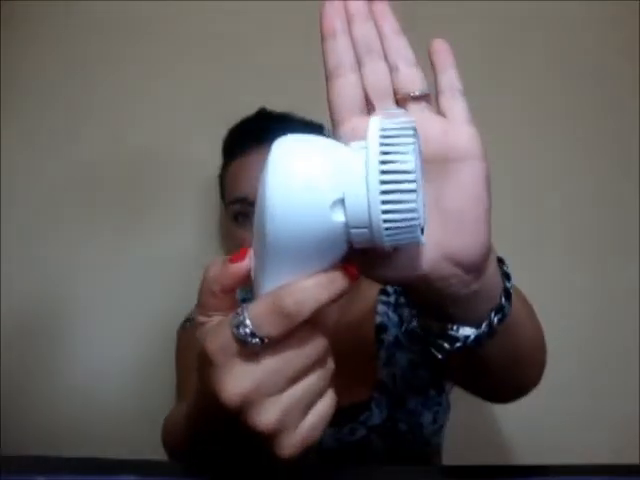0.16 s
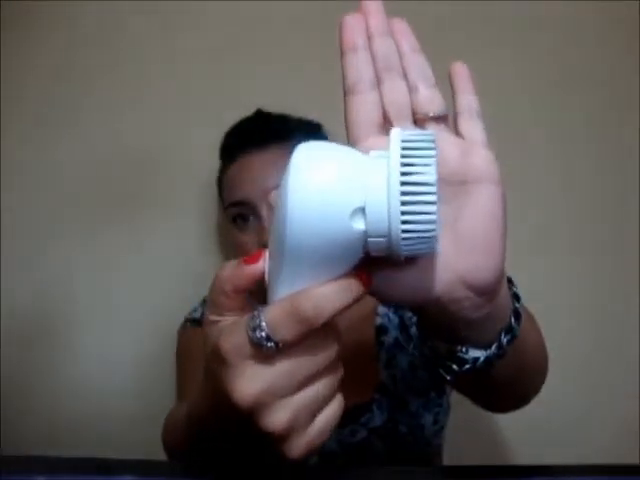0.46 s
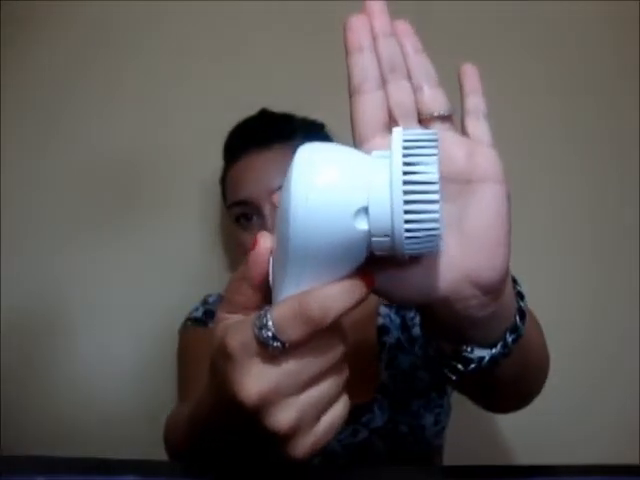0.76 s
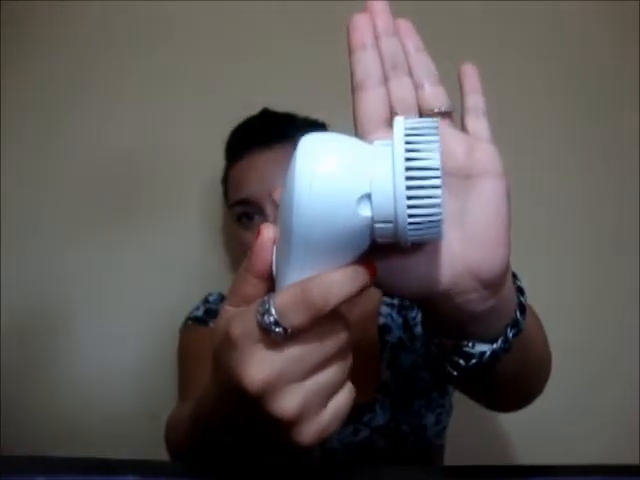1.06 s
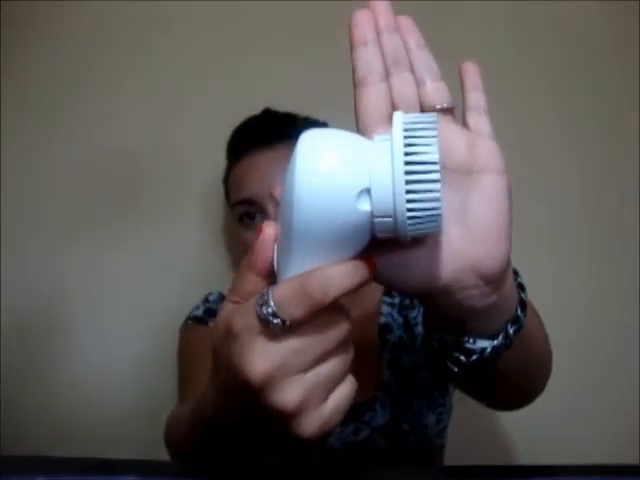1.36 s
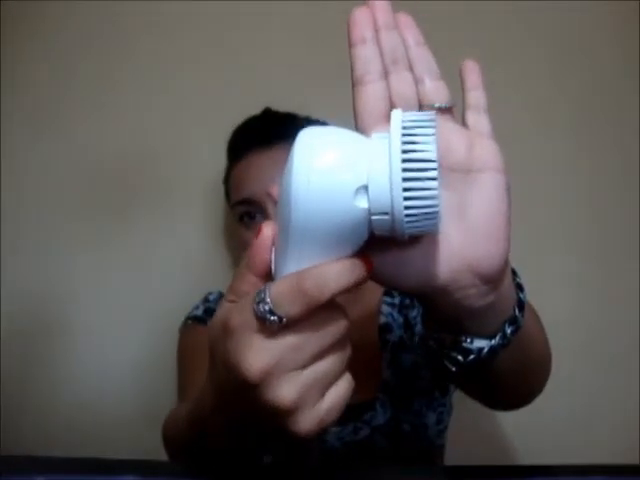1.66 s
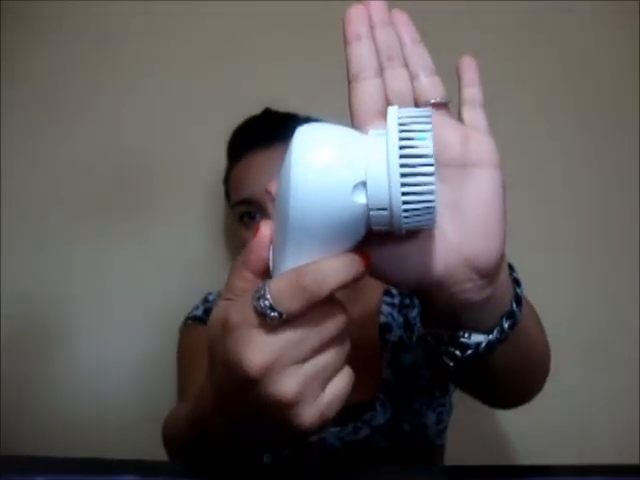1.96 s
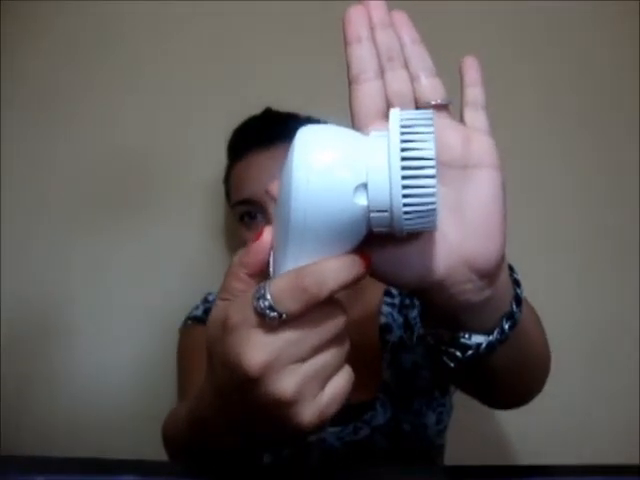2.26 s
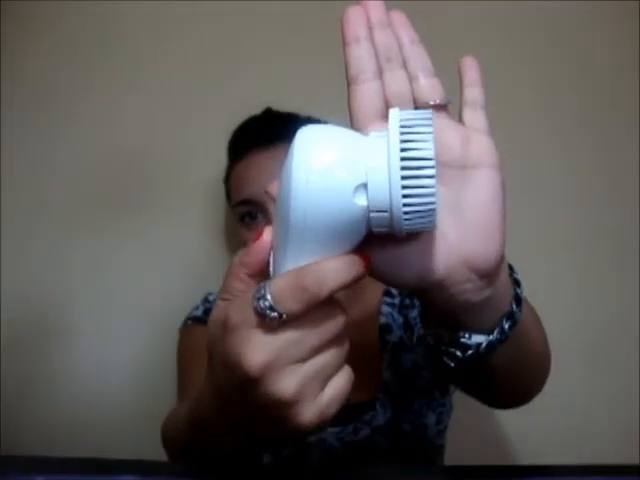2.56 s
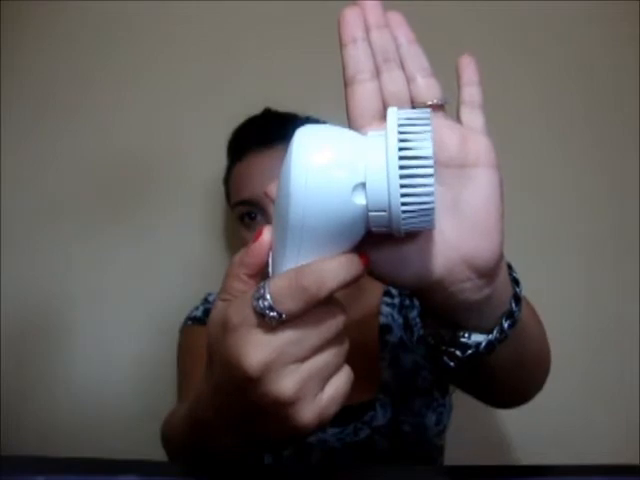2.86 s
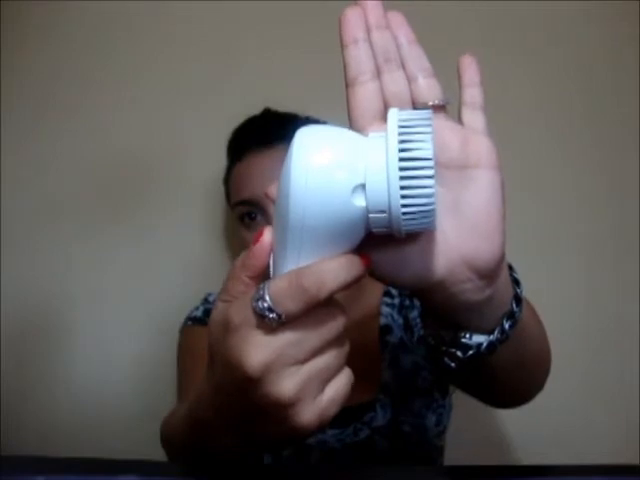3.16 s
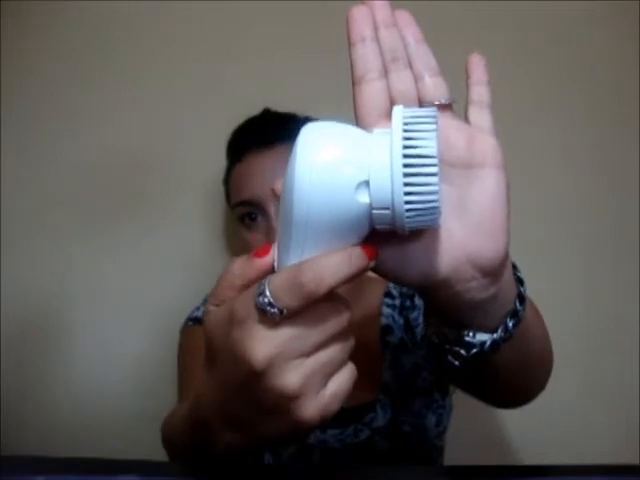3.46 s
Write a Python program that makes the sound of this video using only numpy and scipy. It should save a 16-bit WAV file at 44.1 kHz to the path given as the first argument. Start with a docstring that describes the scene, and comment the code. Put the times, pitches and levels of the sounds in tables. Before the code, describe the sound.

A handheld electric facial brush buzzes loudly with a rattling plastic tone, snaps off and winds down, clicks again after a short gap, then runs slower and softer, close to the microphone in a small room.

```python
"""A battery facial brush runs fast against a palm in a small, quiet room with a faint rush, hiss and tones.
Each turn the drive knocks and rings the plastic housing; gear chatter and bristle rub are filtered noise.
The switch snaps (noise burst, ping, thump, spring); the fast run slows down and fades out, leaving the room.
After further clicks the motor starts again at its slow speed, its knocks following the palm's pressure."""
import sys
import numpy as np
from scipy import signal
from scipy.fft import rfft, irfft
from scipy.io import wavfile
from scipy.ndimage import uniform_filter1d

SR = 44100
rng = np.random.default_rng(int(sys.argv[2]) if len(sys.argv) > 2 else 0)


def master(y):
    """Save y as 16-bit WAV."""
    cut = np.clip(np.atleast_2d(y).T, -1, 1)
    pcm = np.round(cut * 32767)  # scale
    wavfile.write(sys.argv[1], SR, pcm.astype(np.int16))


N = 158760


def undb(db):
    """Decibels to gain."""
    return 10 ** (np.asarray(db) / 20)


def unit(x):
    """Scale to unit energy."""
    return x / np.sqrt(np.sum(x ** 2))


def curve(rows, t):
    """Straight lines through (time [s], value) rows."""
    return np.interp(t, *np.array(rows).T)


def through(x, response):
    """Filter a sound by an impulse response."""
    return signal.fftconvolve(x, response)[:N]


ONSET_S = 0.0004


def colour(points, size=4096, causal=0.84, lead=0):
    """Unit-energy response of a (Hz, dB) spectrum; causal < 1 puts part of it before the peak at `lead`."""
    hz, db = np.array(points).T
    bin_hz = np.maximum(np.arange(size // 2 + 1) * SR / size, 1)
    log_gain = np.log(undb(np.interp(np.log(bin_hz), np.log(hz), db)))
    cepstrum = irfft(log_gain)
    # share = 1 everywhere is minimum phase; less softens the onset
    share = 1 - (1 - causal) * np.exp(-np.arange(1, size // 2) / SR / ONSET_S)
    cepstrum[1:size // 2] *= 1 + share
    cepstrum[size // 2 + 1:] *= 1 - share[::-1]
    response = irfft(np.exp(rfft(cepstrum)))
    return unit(np.roll(response, lead))


def fade(t60_s):
    """Exponential decay, half a second long."""
    return np.exp(-np.log(1000) * np.arange(SR // 2) / SR / t60_s)


def mode(hz, t60_s):
    """One ringing mode of unit energy."""
    t = np.arange(SR // 2) / SR
    return unit(np.cos(2 * np.pi * hz * t) * fade(t60_s))


def impulses(times_s, gains, size=8):
    """Band-limited impulses (windowed sinc) placed between samples."""
    at = np.asarray(times_s)[:, None] * SR
    index = at.astype(int) + np.arange(1 - size, size + 1)
    offset = index - at
    taps = np.sinc(offset) * np.sinc(offset / size) * np.asarray(gains)[:, None]
    return np.bincount(np.clip(index, 0, N).ravel(), taps.ravel(), N + 1)[:N]


# room air spectrum: (frequency [Hz], relative density [dB per Hz])
AIR_SPECTRUM = [(25, -33), (38, -35.5), (55, -18), (80, -10.5), (100, -11), (135, -2), (180, -7.5),
                (240, 1.5), (340, 1), (450, -2.5), (900, 0.5), (1300, -8.5), (2000, -14), (3000, -11),
                (3600, -20.5), (4900, -16.5), (6350, -18.5), (6750, -10.5), (7000, -17), (10000, -23)]
# faint steady room tones: (frequency [Hz], RMS level [dB])
ROOM_TONES = [(236.9, -67), (834.4, -68), (2885, -79), (5604, -75.5)]
AIR_DB = -48


def background():
    """Steady rush and hiss as coloured noise, plus faint sine tones."""
    t = np.arange(N) / SR
    air = undb(AIR_DB) * through(rng.standard_normal(N), colour(AIR_SPECTRUM))
    tones = sum(undb(db) * np.sqrt(2) * np.sin(2 * np.pi * hz * t) for hz, db in ROOM_TONES)
    return air + tones


ROOM_DB, ROOM_T60_S, ROOM_TREBLE_T60_S, ROOM_DELAY_S = -7, 0.45, 0.2, .004


def room(x, split_hz=2500):
    """Diffuse reflections of a small room as decaying noise; the treble dies sooner."""
    noise = rng.standard_normal(SR // 2)
    low = signal.sosfilt(signal.butter(2, split_hz, fs=SR, output="sos"), noise)
    treble = noise - low
    arrived = np.arange(SR // 2) / SR > ROOM_DELAY_S
    tail = (low * fade(ROOM_T60_S) + treble * fade(ROOM_TREBLE_T60_S)) * arrived
    return undb(ROOM_DB) * through(x, unit(tail))


# first reflections off the hand and nearby surfaces: (delay [s], level [dB])
FIRST_REFLECTIONS = [(.0016, -14), (.0042, -23.5), (.0073, -19.5)]


def reflected(x):
    """Direct sound plus delayed, weaker copies off near surfaces."""
    delays_s, db = np.array(FIRST_REFLECTIONS).T
    return x + through(x, impulses(delays_s, undb(db))[:SR // 20])


# snaps and small ticks: (time [s], crack level [dB], ping level [dB], thump level [dB])
SWITCH_SNAPS = [(1.4651, -23, -17, -42), (1.4658, 4, -6, -17), (1.4685, -20, -17, -40),
                (1.4795, -5.5, -44, -41), (1.845, -24, -50, -44), (2.0624, -14, -33, -40),
                (2.0645, -3.5, -21, -17), (2.077, -27, -44, -50), (2.0777, -20, -48, -47),
                (2.097, -19, -32, -45)]
# crack spectrum: (frequency [Hz], relative level [dB])
CRACK_SPECTRUM = [(100, -4.5), (800, -26), (1400, 1.5), (2100, 2.5), (2600, -3.5), (3200, 9), (3800, 3.5),
                  (4500, 1.5), (5600, -9.5), (7500, -20), (10000, 0)]
# dull knock of the whole body under the thumb: (frequency [Hz], relative level [dB])
THUMP_SPECTRUM = [(25, 1), (60, -1), (200, 1.5), (500, -3.5), (900, -17), (1600, -11), (4000, -42)]
RATTLE_T60_S, CRACK_SHARE = 0.023, 0.8
PING_HZ, PING_T60_S = 9400, 0.031
SPRING_HZ, SPRING_T60_S, SPRING_RE_CRACK_DB = 3235, 0.11, -11


def switch():
    """The button snaps: crack with a short plastic rattle, bright ping, soft thump, ringing spring."""
    times_s, crack_db, ping_db, thump_db = np.array(SWITCH_SNAPS).T
    snap = unit(rng.standard_normal(SR // 2) * fade(RATTLE_T60_S))
    snap[0] += CRACK_SHARE
    crack = through(through(impulses(times_s, undb(crack_db)), unit(snap)), colour(CRACK_SPECTRUM))
    ping = through(impulses(times_s, undb(ping_db)), mode(PING_HZ, PING_T60_S))
    thump = through(impulses(times_s, undb(thump_db)), colour(THUMP_SPECTRUM))
    spring_blows = impulses(times_s, undb(crack_db + SPRING_RE_CRACK_DB))
    spring = through(spring_blows, mode(SPRING_HZ, SPRING_T60_S))
    return crack + ping + thump + spring


def hum(rate_hz, turns, hum_db):
    """Unbalance: a sine once a turn, growing with speed squared, level smoothed over 50 ms."""
    swing = uniform_filter1d((rate_hz / rate_hz.max()) ** 2, SR // 20)
    return undb(hum_db) * np.sqrt(2) * np.sin(2 * np.pi * turns) * swing


# rub of gears and bristles: (frequency [Hz], relative density [dB per Hz])
RUB_SPECTRUM = [(200, -23), (600, -15.5), (1000, -3.5), (1500, 11), (2000, -16), (2200, -4.5), (3000, -4),
                (3500, -13), (5000, -5.5), (5900, -18.5), (7100, -13.5), (8200, -26), (10000, -31)]
RUB_BASE_DB, RUB_DECAY_TURNS, RUB_STEADY = -40.5, 0.87, .35


def rub(turns, force_gain, rub_db):
    """Friction noise, strongest at the start of each turn, over a steady share."""
    contact = (RUB_STEADY + np.exp(-(turns % 1) / RUB_DECAY_TURNS)) * force_gain
    return undb(RUB_BASE_DB + rub_db) * through(rng.standard_normal(N) * contact, colour(RUB_SPECTRUM))


# bright gear chatter: (frequency [Hz], relative level [dB])
CHATTER_SPECTRUM = [(500, -26), (1100, -9), (1800, 20.5), (2150, -4.5), (2400, 8.5), (3050, 20),
                    (3400, -12.5), (4400, -8), (5100, 8), (5900, -18.5), (7100, -2), (8200, -19.5),
                    (10000, -32)]
CHATTER_DB, CHATTER_T60_S = -19.5, 0.03


def chatter(blows):
    """Gear teeth rattle after each knock: one short noise burst, repeated."""
    burst = rng.standard_normal(SR // 2) * fade(CHATTER_T60_S)
    teeth = unit(through(burst, colour(CHATTER_SPECTRUM)))
    return undb(CHATTER_DB) * through(blows, teeth)


WHINE_HZ, WHINE_T60_S, WHINE_SCATTER_DB = 1483, .12, 2


def whine(times_s, gains, singing, whine_db):
    """The strongest resonance sings on unevenly between the knocks."""
    uneven = gains * undb(WHINE_SCATTER_DB * singing)
    return undb(whine_db) * through(impulses(times_s, uneven), mode(WHINE_HZ, WHINE_T60_S))


# modes of the plastic housing: (frequency [Hz], T60 [s], relative level [dB])
HOUSING_MODES = [(685.6, 0.15, -6), (834.3, 0.24, 4), (1180, 0.038, -14.5), (1570, 0.024, -8),
                 (1849, 0.022, -4), (2374, 0.12, -25), (3010, 0.12, -25.5), (4416, 0.027, -17),
                 (4970, 0.058, -23.5), (7000, 0.093, -28)]
RING_DB = -20


def housing(blows):
    """Each knock excites the decaying modes of the housing."""
    modes = sum(undb(db) * mode(hz, t60_s) for hz, t60_s, db in HOUSING_MODES)
    return undb(RING_DB) * through(blows, modes)


# dry knock of the drive: (frequency [Hz], relative level [dB])
KNOCK_SPECTRUM = [(60, -50), (250, -19), (480, -19.5), (600, -9.5), (690, -2), (780, -1), (900, -6),
                  (1020, -9), (1150, -1.5), (1350, -7.5), (1600, 1.5), (1780, -2), (1900, 2), (2020, -0.5),
                  (2170, -15), (2370, -4.5), (2650, -10.5), (3050, -13.5), (3300, -19), (4400, -31.5),
                  (5900, -48), (10000, -62.5)]
KNOCK_BASE_DB, KNOCK_CAUSAL, KNOCK_LEAD_SAMPLES = -5, 0.52, 128


def knock(blows, dryness_db):
    """Dry knock once a turn: a pulse with a soft rounded onset, part of it before the peak."""
    response = colour(KNOCK_SPECTRUM, causal=KNOCK_CAUSAL, lead=KNOCK_LEAD_SAMPLES)
    aligned = signal.fftconvolve(blows, response)[KNOCK_LEAD_SAMPLES:KNOCK_LEAD_SAMPLES + N]
    return undb(KNOCK_BASE_DB + dryness_db) * aligned


FORCE_SCATTER_DB, MIN_JITTER_S = 0.62, .000005


def brush(speed, force, dryness, stumble, hum_db, rub_db, whine_db):
    """One run: a knock per turn drives ring, whine and chatter; rub and hum follow the rotation."""
    t = np.arange(N) / SR
    running = (t >= speed[0][0]) & (t <= force[-1][0])
    rate_hz = curve(speed, t) * running
    turns = np.cumsum(rate_hz) / SR
    times_s = np.interp(np.arange(1, int(turns[-1]) + 1), turns, t)
    # one row per knock, with rows to spare
    late, hard, singing = rng.standard_normal((N // 100, 3))[:len(times_s)].T
    times_s = times_s + (MIN_JITTER_S + curve(stumble, times_s)) * late
    gains = undb(curve(force, times_s) + FORCE_SCATTER_DB * hard)
    blows = impulses(times_s, gains)
    struck = chatter(blows) + whine(times_s, gains, singing, whine_db) + housing(blows)
    moving = hum(rate_hz, turns, hum_db) + rub(turns, undb(curve(force, t)) * running, rub_db)
    return moving + struck + knock(blows, curve(dryness, t))


# fast run, slowing at its end: (time [s], knock rate [1/s])
FAST_RATE = [(0, 89.5), (.06, 89.2), (.145, 86.7), (.19, 88.4), (.265, 88.7), (.34, 86.9), (.45, 87.2),
             (.555, 85.4), (.62, 86.9), (.755, 85.1), (.84, 86.3), (.92, 86.1), (.975, 85.3), (1.05, 86.5),
             (1.14, 86.5), (1.19, 85), (1.275, 87.2), (1.4, 85.2), (1.468, 86), (1.5, 71), (1.58, 51)]
# knock strength: (time [s], level [dB])
FAST_STRENGTH = [(0, 0), (.08, -1.5), (.13, -2), (.3, -2), (.47, -1), (.76, -1), (.87, -2.5), (.98, -2.1),
                 (1.07, -3.5), (1.2, -2), (1.3, -3.5), (1.42, -3.5), (1.5, -7), (1.575, -12), (1.6, -38)]
# dry knock against ringing, mostly drier as the run goes on: (time [s], level [dB])
FAST_DRYNESS = [(0, -8), (.15, -6), (.35, -3), (.6, -2.5), (1.0, -1.5), (1.2, -3), (1.4, -1.5), (1.58, -1)]
# bristles catch, knocks stumble: (time [s], added timing spread [s])
FAST_SPREAD = [(0, 0.000014), (.32, 0.000028), (.42, 0.00018), (0.519, 0.00011), (.6, 0.000019),
               (1.13, 0.0000061), (1.24, 0.0001), (1.36, 0.000041)]


def fast_run():
    """Fast rotation that slows down and fades out after the switch snap."""
    return brush(FAST_RATE, FAST_STRENGTH, FAST_DRYNESS, FAST_SPREAD,
                 hum_db=-61.5, rub_db=1.5, whine_db=-9)


# slow run: (time [s], knock rate [1/s])
SLOW_RATE = [(2.2, 48.3), (2.29, 53), (2.35, 55.2), (2.41, 62), (2.455, 61.5), (2.485, 63.1), (2.56, 63.6),
             (2.61, 64.7), (2.645, 62.8), (2.69, 62.3), (2.75, 64.4), (2.99, 64.6), (3.05, 62.4),
             (3.1, 64.3), (3.17, 65.5), (3.32, 65.9), (3.37, 63.7), (3.42, 63.7), (3.46, 66.3), (3.6, 65.8)]
# knock strength, follows palm pressure: (time [s], level [dB])
SLOW_STRENGTH = [(2.2, -27), (2.28, -18.5), (2.32, -17), (2.37, -20.5), (2.46, -9.5), (2.56, -12),
                 (2.62, -8), (2.68, -13), (2.74, -13.5), (2.82, -10.5), (2.99, -9), (3.09, -13.5),
                 (3.17, -7.5), (3.33, -7), (3.43, -14.5), (3.521, -5.5), (3.6, -9.5)]
# dry knock against ringing, constant: (time [s], level [dB])
SLOW_DRYNESS = [(2.3, 0), (2.5, 0), (3.6, 0)]
# bristles catch, knocks stumble: (time [s], added timing spread [s])
SLOW_SPREAD = [(2.3, 0.000086), (2.5, 0.00006), (3.2, 0.000038), (3.32, 0.000059), (3.55, 0.000036)]


def slow_run():
    """The motor spins up to its slow speed; knock strength follows the palm."""
    return brush(SLOW_RATE, SLOW_STRENGTH, SLOW_DRYNESS, SLOW_SPREAD,
                 hum_db=-75, rub_db=-1, whine_db=-5.5)


SWITCH_TO_ROOM_DB = -10


def scene():
    """Fast run, switch clicks and slow run in the room."""
    motor = fast_run() + slow_run()
    clicks = switch()
    reverb = room(motor + undb(SWITCH_TO_ROOM_DB) * clicks)
    return (reflected(motor) + clicks + reverb + background())[None]


TOP_HZ = 10080


def record(dry):
    """Steep elliptic low-pass: the top is cut above TOP_HZ."""
    return signal.sosfilt(signal.ellip(12, .2, 70, TOP_HZ, fs=SR, output="sos"), dry)


dry = scene()
out = record(dry)
master(out)
```